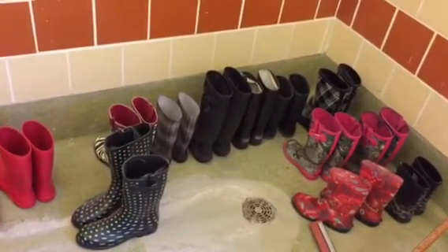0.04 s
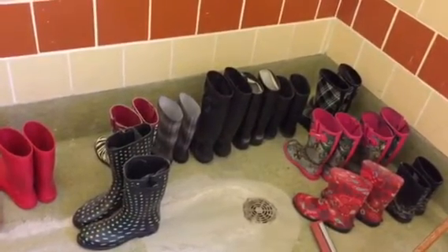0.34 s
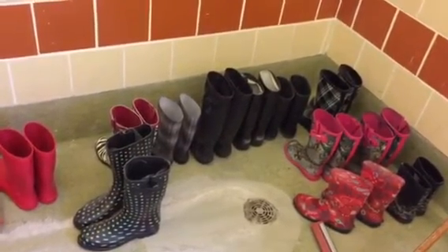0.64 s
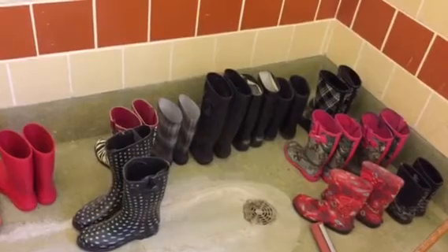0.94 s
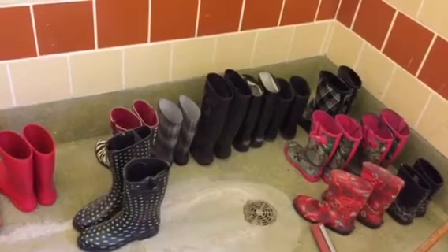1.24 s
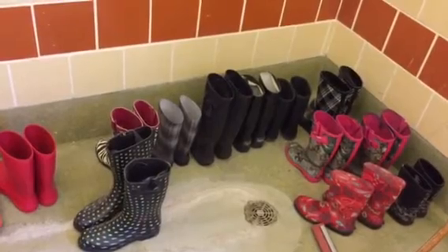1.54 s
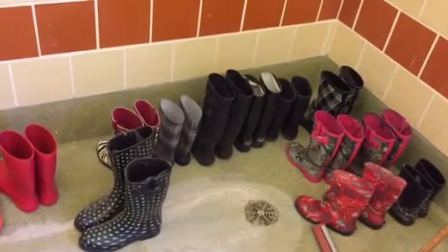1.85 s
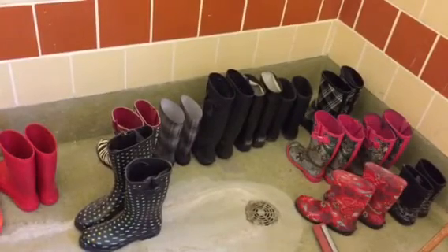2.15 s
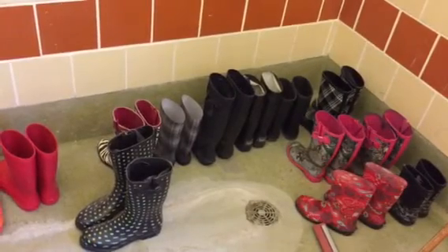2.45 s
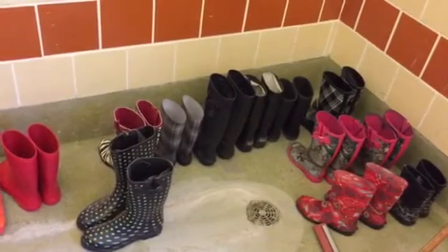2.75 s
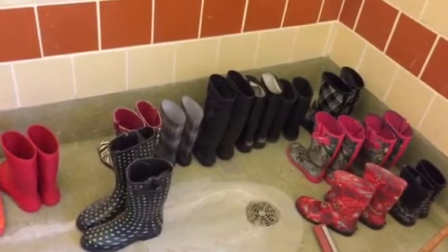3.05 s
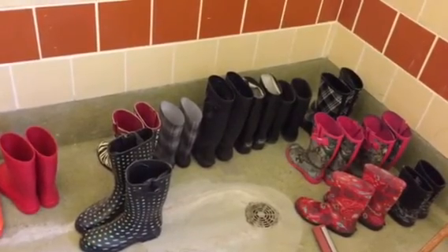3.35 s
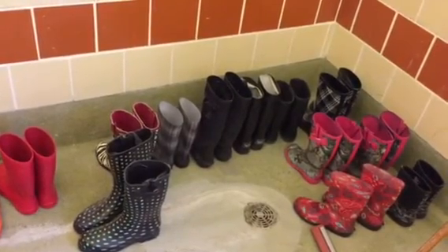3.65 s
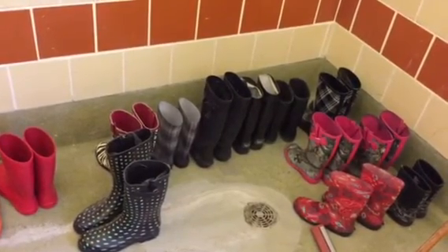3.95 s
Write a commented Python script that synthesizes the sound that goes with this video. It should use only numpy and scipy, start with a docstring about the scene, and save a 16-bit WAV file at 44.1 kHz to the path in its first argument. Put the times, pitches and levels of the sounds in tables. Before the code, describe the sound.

Two crickets chirp in rapid, high-pitched trills for the whole four seconds, one slightly higher and louder, overlapping with only tiny breaks. The tiled room smears them into a ringing shimmer. A faint thin whistling tone fades within the first second, and a few soft, hollow swishes pass between about 0.4 and 2.4 seconds. Occasional faint, very high ticks and a low ventilation rumble lie underneath.

```python
"""A tiled room, where two crickets trill against each other. Each chirp is a pair of wing strokes,
each a short falling tone with overtones and a rasp; the hard walls smear them into a shimmer.
Under them are a few soft swishes, a faint thin whistle, a few very high ticks
and a low ventilation rumble."""
import sys
import numpy as np
from scipy import signal
from scipy.fft import rfft, irfft
from scipy.io import wavfile
from scipy.ndimage import uniform_filter1d, map_coordinates

SR = 44100
rng = np.random.default_rng(int(sys.argv[2]) if len(sys.argv) > 2 else 0)


def wav_out(sig):
    """Save sig, one row per channel (or a flat mono array), as 16-bit PCM at SR to the path in sys.argv[1]."""
    wavfile.write(sys.argv[1], SR, np.round(np.clip(np.atleast_2d(sig).T, -1, 1) * 32767).astype(np.int16))


N = 176400
M = N + SR  # circular buffer: the spare second holds what sounds before the start
T = np.arange(M) / SR
HZ = np.fft.rfftfreq(M, 1 / SR)


# start_s, stroke_count, chirp_period_s, relative_db
HIGH_TRILLS = [(-.11, 6, 0.052, 0.5), (.080, 6, 0.04, 4), (.344, 18, .0412, 3), (.721, 8, 0.049, 2.5),
               (.884, 16, 0.042, 3.5), (1.380, 16, 0.045, 3.5), (1.902, 14, 0.037, 3),
               (2.416, 18, .0405, 2.5), (2.967, 8, .045, 3.5), (3.320, 34, 0.043, 3)]
LOW_TRILLS = [(-.07, 17, .0503, 3.5), (.531, 1, .05, 5), (.574, 16, .0495, 3), (1.150, 1, .05, 0),
              (1.184, 1, .05, -0.5), (1.221, 12, .052, 1.5), (1.541, 9, .0522, 2.5), (1.862, 1, .05, 1),
              (1.895, 11, .0523, 2), (2.197, 1, .05, 0.5), (2.295, 1, .05, 0.5), (2.342, 1, .05, 0),
              (2.385, 3, .038, 2), (2.453, 2, .05, 2), (2.547, 1, .05, 1), (2.576, 1, .05, -3),
              (2.609, 4, .049, 2), (2.907, 1, .05, 1), (2.950, 3, .037, 1.5), (3.029, 5, .05, 3),
              (3.244, 1, .05, -1.5), (3.290, 1, .05, 1.5), (3.530, 1, .05, -1), (3.571, 3, .05, 0),
              (3.655, 6, .0525, 2), (3.979, 2, .05, 3)]
# freq_hz, relative_db
RASP_SPECTRUM = [(3000, -65), (4400, -24), (5150, 13), (5700, 2), (6450, -3.5), (7000, -13.5), (8200, -20),
                 (9400, -22), (10800, -18.5), (11500, -22.5), (14000, -22.5), (15500, -14)]
HIGH_WINGS = dict(pitch_hz=5387.4, fall_hz=141, sag_hz=73, stroke_s=0.01, pair_s=0.0155,
                  swell_power=0.63, rough_rad=0.1, octave_db=-22, twelfth_db=-35, rasp_db=-17,
                  first_chirp_db=-1.5, second_stroke_db=-2.5, second_rasp_db=7.5)
LOW_WINGS = dict(pitch_hz=4919, fall_hz=457, sag_hz=140, stroke_s=0.017, pair_s=0.02,
                 swell_power=0.43, rough_rad=0.031, octave_db=-14, twelfth_db=-26.5, rasp_db=-28,
                 first_chirp_db=0, second_stroke_db=-4, second_rasp_db=-3)

def cricket(trills, pitch_hz, fall_hz, sag_hz, stroke_s, pair_s, swell_power, rough_rad,
            octave_db, twelfth_db, rasp_db, first_chirp_db, second_stroke_db, second_rasp_db,
            scatter_hz=22.4, scatter_db=1.8, scatter_s=0.0007):
    """Paired wing strokes: the file slows as the wings close, so each tone falls."""
    out = np.zeros(M)
    rasp = noise(amp(log_interp(RASP_SPECTRUM, HZ)))
    jitter_rad = rough_rad * wobble(1400)
    travel = np.linspace(-1, 1, int(stroke_s * SR))
    swell = abs(np.cos(travel * np.pi / 2)) ** swell_power
    flare = swell ** 6.3  # overtones only at the stroke's peak
    for start_s, count, period_s, trill_db in trills:
        for stroke, (detune, force, lag, turn) in enumerate(rng.standard_normal((count, 4))):
            chirp, second = divmod(stroke, 2)
            middle_s = start_s + chirp * period_s + second * pair_s + scatter_s * lag
            span = int((middle_s - stroke_s / 2) * SR) + np.arange(len(travel))
            glide_hz = pitch_hz + scatter_hz * detune - fall_hz * travel / 2 - sag_hz * travel ** 2
            phase = 2 * np.pi * (np.cumsum(glide_hz) / SR + turn) + jitter_rad[span]
            overtones = amp(octave_db) * np.sin(2 * phase) + amp(twelfth_db) * np.sin(3 * phase)
            tone = np.sin(phase) + flare * overtones
            scrape = amp(rasp_db + second * second_rasp_db) * rasp[span]
            accent_db = (chirp == 0) * first_chirp_db + second * second_stroke_db
            out[span] += amp(trill_db + accent_db + scatter_db * force) * swell * (tone + scrape)
    return unit(out)


# peak_s, level_db, centre_hz, rise_s, t60_s
SWISHES = [(.44, -49.5, 2330, 0.04, 0.76), (.53, -43.5, 1235, 0.058, 1.8), (.60, -42, 500, 0.11, 1.06),
           (.83, -46.5, 1200, 0.062, 1.2), (1.16, -53.5, 1700, 0.036, 0.96),
           (1.528, -48.5, 1700, 0.031, 0.85), (1.678, -45.5, 491, 0.064, 1.2), (1.76, -49, 1430, 0.13, 1.4),
           (2.35, -57, 1830, .06, 2.63)]

def swishes(width_oct=0.65):
    """Broad, hollow rushes of noise that swell and die away."""
    out = np.zeros(M)
    colour = hollow_colour(base_db=-11)
    for peak_s, level_db, centre_hz, rise_s, t60_s in SWISHES:
        rise = np.exp(-(np.minimum(T - peak_s, 0) / rise_s) ** 2)
        decay = amp(-60 * np.maximum(T - peak_s, 0) / t60_s)
        band = np.exp(-0.5 * (np.log2((HZ + 1) / centre_hz) / width_oct) ** 2)
        out += amp(level_db) * rise * decay * noise(colour * band)
    return out


# time_s, pitch_hz, level_db
WHISTLE_CONTOUR = [(0, 3859, -59), (.11, 3940, -53), (.16, 3870, -63), (.24, 4040, -62), (0.281, 3825, -48),
                   (.45, 3940, -63), (.54, 3950, -85.5), (.6, 3850, -54.5), (0.951, 3840, -73.5)]

def whistle(octave_db=-19, waver_hz=30, stutter_db=4, fade_s=0.05):
    """A thin, stuttering tone that ends within the first second."""
    time_s, pitch_hz, level_db = np.transpose(WHISTLE_CONTOUR)
    phase = 2 * np.pi * np.cumsum(np.interp(T, time_s, pitch_hz) + waver_hz * wobble(400)) / SR
    tone = unit(np.sin(phase) + amp(octave_db) * np.sin(2 * phase))
    level = amp(np.interp(T, time_s, level_db) + stutter_db * wobble(69.02))
    fade = np.clip((time_s[-1] - T) / fade_s, 0, 1)
    return room(level * fade * tone, tail_db=-3, early_db=7)


# peak_s, level_db
TICKS = [(-.02, -51), (.893, -50), (1.83, -67), (2.76, -69)]

def ticks(centre_hz=13600, width_hz=200, width_s=0.018):
    """Brief bursts of very high, narrow noise that hang in the room."""
    envelope = np.zeros(M)
    for peak_s, level_db in TICKS:
        offset_s = (T - peak_s + 0.5) % (M / SR) - 0.5
        envelope += amp(level_db) * np.exp(-(offset_s / width_s) ** 2)
    band = np.exp(-0.5 * ((HZ - centre_hz) / width_hz) ** 2)
    return room(envelope * noise(band), tail_db=14, early_db=7.5)


# pitch_hz, level_db
FAN_TONES = [(45.5, -47), (89.5, -54), (130, -51)]
# freq_hz, relative_db
AIR_SPECTRUM = [(20, -30), (35, -26), (60, -2.5), (100, -1), (150, 1.5), (220, -3.5), (320, -15.5),
                (480, -20.5), (700, -19.5), (900, -21), (1500, -22), (2100, -30.5), (3500, -39),
                (7000, -48), (12000, -48.5), (15500, -58)]

def ventilation(air_db=-43, drift_rad=0.65, flutter_db=2.3, waver_db=2.02, edges_hz=(300, 1000, 2000)):
    """Unsteady fan tones over rumble and room air that waver band by band."""
    hum = np.zeros(M)
    for pitch_hz, level_db in FAN_TONES:
        level = amp(level_db + flutter_db * wobble(6.83))
        hum += level * unit(np.sin(2 * np.pi * pitch_hz * T + drift_rad * wobble(10)))
    spectrum = rfft(noise(amp(log_interp(AIR_SPECTRUM, HZ)) * hollow_colour(base_db=0)))
    band = np.searchsorted(edges_hz, HZ)
    air = sum(irfft(spectrum * (band == k), M) * amp(waver_db * wobble(12)) for k in np.unique(band))
    return hum + amp(air_db) * air


# freq_hz, t60_s
ROOM_DECAY = [(4000, 0.57), (4900, 0.76), (5400, 0.58), (6200, 0.21), (10000, 0.34), (13500, 0.36),
              (15500, 0.26)]

def room(x, tail_db, early_db, early_t60_s=0.099, gap_s=0.002):
    """Direct sound, a flurry of early echoes off the tiles and a longer tail."""
    freq_hz, time_s, grains = signal.stft(rng.standard_normal(SR * 3 // 4), SR, nperseg=256)
    decay = amp(-60 * time_s / log_interp(ROOM_DECAY, freq_hz)[:, None])
    tail_ir = signal.istft(grains * decay, SR, nperseg=256)[1]
    early_ir = rng.standard_normal(M) * amp(-60 * T / early_t60_s) * (T > gap_s)
    tail, early = (unit(irfft(rfft(x) * whitened(ir), M)) for ir in (tail_ir, early_ir))
    return np.std(x) * unit(unit(x) + amp(tail_db) * tail + amp(early_db) * early)


def room_ring(x, pitch_hz=5336, t60_s=0.28, ring_db=-4.5):
    """A sound plus the room resonance it excites."""
    width_hz = np.log(1000) / np.pi / t60_s
    ring = irfft(rfft(x) * resonance(pitch_hz, width_hz), M)
    return unit(unit(x) + amp(ring_db) * unit(ring))


# centre_hz, width_hz, relative_db
ROOM_MODES = [(686, 11, 4.5), (1060, 9.1, -13), (1223, 25.7, -3), (1610, 14, -15), (2450, 44, -8),
              (3025, 55, -7)]

def hollow_colour(base_db, ripple_db=3.5, ripple_hz=55):
    """Gain per frequency: room resonances over a finely rippled base."""
    top_db = max(db for _, _, db in ROOM_MODES)
    power = sum(abs(amp(db - top_db) * resonance(hz, width_hz)) ** 2 for hz, width_hz, db in ROOM_MODES)
    ripple = map_coordinates(rng.standard_normal(len(HZ)), [HZ / ripple_hz], order=1)
    ripple *= (HZ > 280) & (HZ < 4000)
    return amp(base_db + ripple_db * ripple) + np.sqrt(power)


def resonance(centre_hz, width_hz):
    """Complex response of one mode."""
    return 1j * HZ * width_hz / (centre_hz ** 2 - HZ ** 2 + 1j * HZ * width_hz)


def whitened(ir, span_hz=200):
    """Echo spectrum, rippled in detail but flat overall."""
    spectrum = rfft(ir, M)
    power = uniform_filter1d(abs(spectrum) ** 2, size=int(span_hz / HZ[1]))
    return spectrum / np.sqrt(abs(power) + 1e-12)


def noise(gain):
    """Noise of rms 1, shaped by a gain per frequency."""
    return unit(irfft(rfft(rng.standard_normal(M)) * gain, M))


def wobble(rate_hz):
    """Random values joined by straight lines."""
    return map_coordinates(rng.standard_normal(M), [T * rate_hz], order=1)


def log_interp(points, freq_hz):
    """Interpolate on a log frequency axis."""
    knots_hz, values = np.transpose(points)
    return np.interp(np.log(freq_hz + 1), np.log(knots_hz + 1), values)


def amp(db):
    """Decibels to gain."""
    return 10 ** (np.asarray(db) / 20)


def unit(x):
    """Scale to rms 1."""
    return x / np.sqrt(np.mean(x ** 2) + 1e-20)


def scene(high_db=-37, low_db=-43):
    """Two crickets, each with its own echoes, over the background."""
    high = amp(high_db) * room_ring(room(cricket(HIGH_TRILLS, **HIGH_WINGS), tail_db=2, early_db=2))
    low = amp(low_db) * room(cricket(LOW_TRILLS, **LOW_WINGS), tail_db=0.5, early_db=-1.5)
    return (high + low + ticks() + whistle() + swishes() + ventilation())[None, :N]


def record(dry, cutoff_hz=15780):
    """Brick-wall low-pass."""
    return irfft(rfft(dry, M) * (HZ < cutoff_hz), M)[:, :N]


dry = scene()
out = record(dry)
wav_out(out)
```